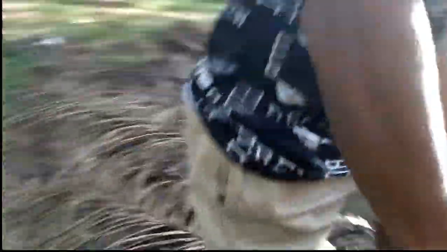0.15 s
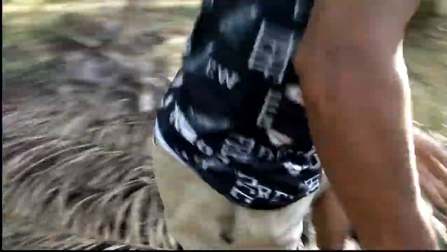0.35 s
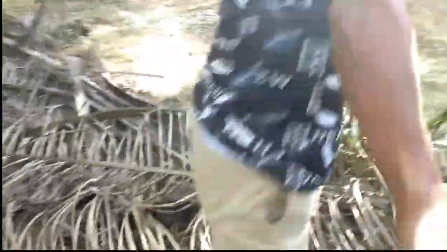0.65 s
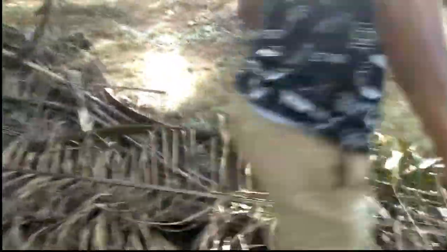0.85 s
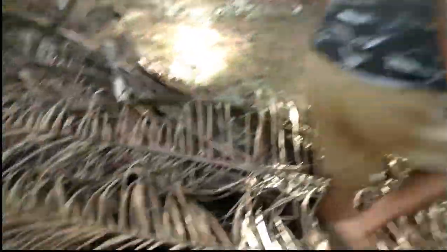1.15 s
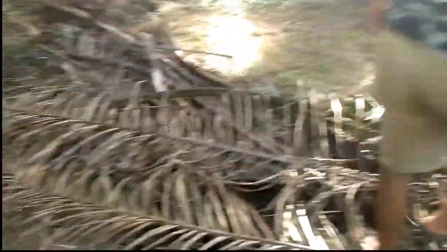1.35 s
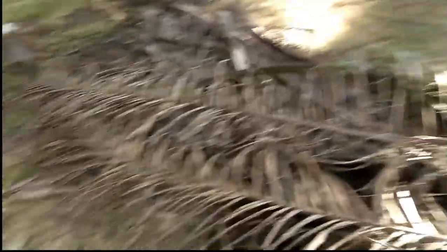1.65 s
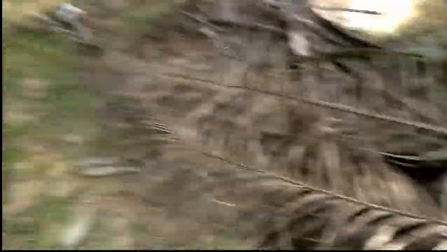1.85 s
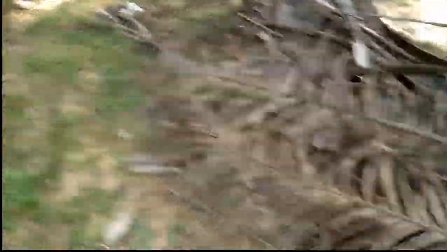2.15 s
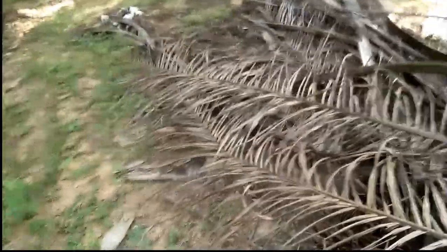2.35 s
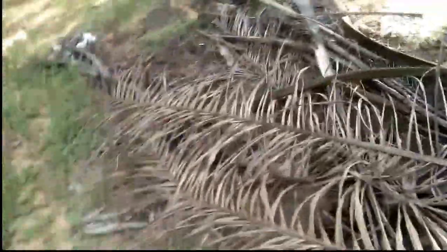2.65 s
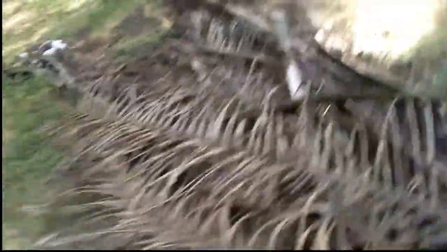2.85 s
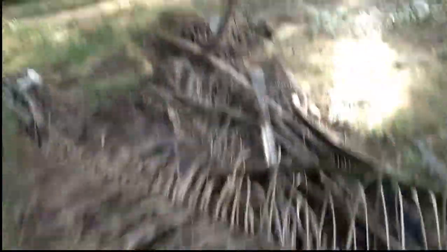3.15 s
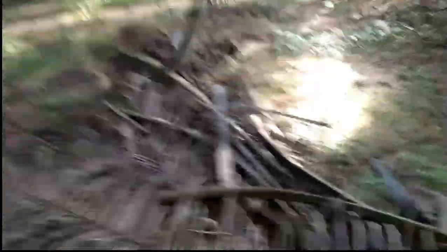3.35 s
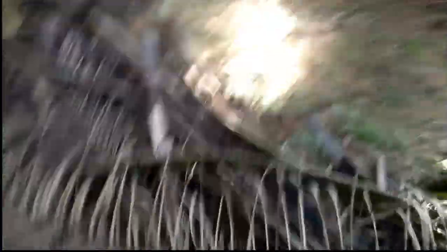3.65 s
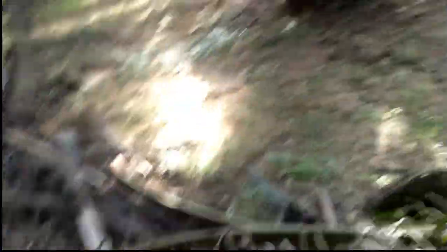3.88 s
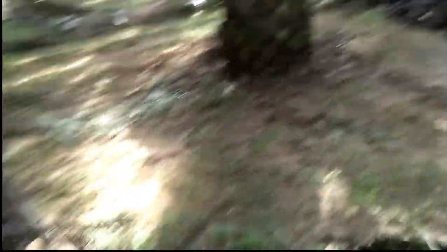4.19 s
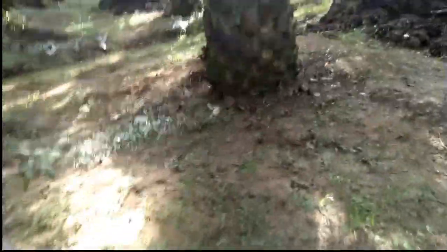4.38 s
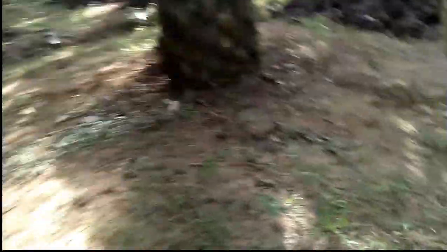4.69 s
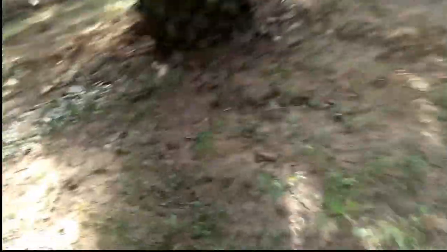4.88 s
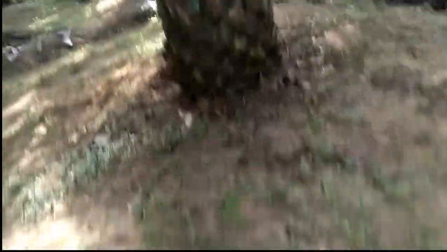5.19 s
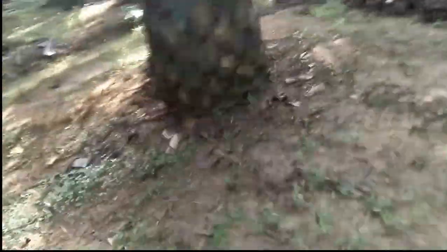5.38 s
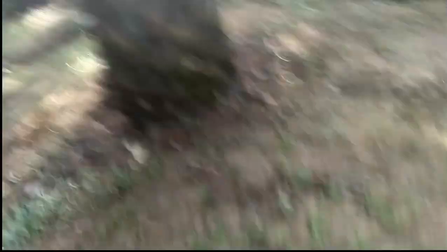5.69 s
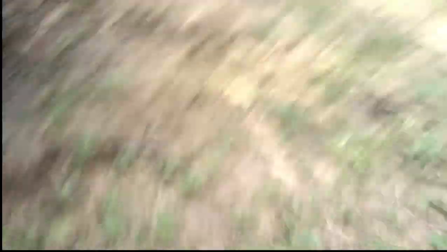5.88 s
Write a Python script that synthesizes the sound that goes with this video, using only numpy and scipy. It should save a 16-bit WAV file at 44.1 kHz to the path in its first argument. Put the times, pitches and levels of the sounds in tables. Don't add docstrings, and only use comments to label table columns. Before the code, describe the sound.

Close to a handheld camera and mostly on its left, dry palm leaflets are brushed aside in bright, papery rustles, with ticks and small rib snaps. The scraping thins out just before four and a half seconds, then feet trample the fronds: stalks crack and knock, soil crunches, and the loudest breaks come just after five seconds. Outdoors, with faint air, insects, a far engine hum and light wind rumble.

```python
import sys
import numpy as np
from scipy import signal
from scipy.fft import rfft, irfft, next_fast_len
from scipy.io import wavfile
from scipy.ndimage import uniform_filter1d, map_coordinates

SR = 44100
rng = np.random.default_rng(int(sys.argv[2]) if len(sys.argv) > 2 else 0)


def level_to_linear(level):
    exponent = np.asarray(level, float) / 20
    return 10 ** exponent


def store_pcm(level_fs):
    pcm = np.round(np.clip(level_fs, -1, 1) * 32767).astype(np.int16)
    wavfile.write(sys.argv[1], SR, np.atleast_2d(pcm).T)


N = 265923
LAG = 13
GRAIN = 192

# pitch in Hz, level in dB per Hz.
AIR_COLOUR = [(90, -30.5), (130, -17), (170, -23.5), (330, -25), (670, -36), (2200, -38.5), (3800, -29),
              (8400, -31), (15500, -22), (17000, -28.5)]
# pitch in Hz, level in dB per Hz.
WIND_COLOUR = [(4.7, -38), (8.0, 6.5), (17, 9.5), (54, -1.5), (64, -10), (81, -14), (140, -21), (180, -50),
               (310, -120)]
# time in seconds, level in dB.
WIND_LEVEL = [(0.0, -53.5), (0.3, -51.5), (0.5, -59.5), (0.62, -59), (0.8, -50), (1.1, -52.5), (1.45, -60),
              (2.1, -54), (2.55, -51.5), (3.05, -49), (3.5, -51.5), (4.15, -56.5), (4.5, -51),
              (4.89, -44.5), (5.15, -40.5), (5.42, -45.5), (5.64, -43.5), (5.9, -44)]
# pitch in Hz, width in Hz, level in dB.
ENGINE_HUMS = [
    (54.4, 14.6, -60.5),
    (108.4, 36, -68.5),
    (320, 2.4, -80),
]
# pitch in Hz, likeness from 0 to 1.
LIKENESS = [(60, 1), (300, 0.78), (1400, 0.027), (6800, 0.099), (15000, .1)]
# start in seconds, step in dB.
PORT_JOLTS = [
    (5.277, -18),
    (5.2991, -6.5),
    (5.303, -29.5),
    (5.31, -40),
]
# pitch in Hz, level in dB per Hz.
EDGE_COLOUR = [(2650, -36.5), (4500, -11.5), (5960, -10), (7260, -4), (8830, -2.5), (9410, 0), (11500, 1.5),
               (14900, -5.5), (16800, -15)]
# pitch in Hz, level in dB per Hz.
BLADE_COLOUR = [(760, -10), (1300, -14), (1530, -11.5), (2270, -3.5), (3460, -0.5), (4470, -1), (6000, -5),
                (7800, -87), (13200, -120)]
# pitch in Hz, level in dB per Hz.
STALK_COLOUR = [(100, -9), (170, -4.5), (367, 0), (620, -1), (787, -6.5), (1060, -4.5), (1700, -5),
                (2210, -11), (3740, -120)]
# start in seconds, peak in dB, pitch in Hz.
STALK_KNOCKS = [(1.013, -27, 296), (2.307, -36, 1020), (3.88, -41, 232), (5.144, -12, 573),
                (5.159, -13.5, 810), (5.189, -25, 780), (5.228, -16.5, 588), (5.304, -35, 228),
                (5.312, -58, 236), (5.501, -42.5, 407), (5.757, -37.5, 650), (5.874, -33.5, 630),
                (5.902, -65, 237), (6.011, -31.5, 350), (6.021, -25.5, 302)]
# start in seconds, peak in dB, pitch in Hz.
RIB_PINGS = [
    (0.793, -18, 1770),
    (1.013, -17, 1700),
    (1.023, -20, 1270),
    (1.424, -32, 2470),
    (1.508, -43.5, 2620),
    (4.922, -17.5, 1260),
    (5.851, -34, 2450),
    (1.711, -12.5, 3760),
    (5.299, -1, 2570),
    (5.8611, -25, 3770),
]
# start in seconds, peak in dB, left over right in dB.
EDGE_FLICKS = [(.2672, -30, -6), (0.317, -30, 13), (0.546, -41, -11), (.68, -28, -7), (.7961, -37, 5),
               (.8992, -26, -3), (.9368, -24, 2), (.9552, -30, -4), (.9669, -22, -4), (1.1032, -31, 6),
               (1.164, -25.5, -4), (1.168, -33, -1), (1.1917, -26, -11), (1.2805, -30, -5),
               (1.3376, -36, 3), (1.3807, -22, -3), (1.39, -31, 0), (1.4283, -19, -8), (1.4313, -23, 4),
               (1.6469, -28, 5), (1.7056, -16, 1), (1.7085, -16, 6), (1.7162, -19, 2), (1.9988, -27, 2),
               (2.0208, -28, 6), (2.539, -35, 13), (2.5653, -33, 18), (2.6603, -29.5, 8.5),
               (2.7126, -42, 9), (2.7486, -30, 9), (2.917, -31.5, 3), (3.242, -25, 7), (3.4391, -25, -2),
               (3.4445, -27, 4.5), (3.5279, -33, 3), (3.9384, -29, -3), (4.4436, -27, 6), (4.4707, -32, 6),
               (4.4961, -22, 9), (4.7773, -31, 4), (4.8081, -29, 4), (4.8095, -26.5, 1), (4.8946, -19, 2),
               (4.901, -22, 8), (4.9757, -19, 11), (5.0175, -26, 4), (5.1087, -19, 7), (5.1109, -20, 10),
               (5.1625, -12, 6), (5.2195, -18, 7), (5.487, -29, 11), (5.599, -36, 15), (5.613, -35, 6),
               (5.686, -39, 5), (5.7728, -33, 9), (5.8047, -26, 5), (5.8588, -25, 10), (5.9576, -24, 7),
               (5.965, -25, 4), (6.0001, -34, 10)]
# start in seconds, peak in dB, pitch in Hz.
RIB_POPS = [(0.655, -47, 3290), (0.761, -46, 3420), (0.937, -38, 1090), (0.957, -37, 3770),
            (1.103, -32, 4220), (1.111, -32, 3140), (1.198, -41, 4330), (1.314, -48, 3650),
            (1.512, -40, 3030), (1.792, -47, 3670), (1.82, -46, 2180), (2.125, -35, 2520),
            (2.184, -36, 2620), (2.362, -48, 3680), (2.649, -41, 2110), (2.68, -53, 3030),
            (2.772, -44, 3360), (3.425, -40.5, 3370), (3.554, -42, 4400), (3.843, -34, 2650),
            (3.936, -44, 1310), (3.948, -47, 4270), (3.992, -43, 1260), (4.457, -31, 3550),
            (4.486, -29.5, 3100), (4.515, -30, 3750), (4.705, -34, 4500), (4.81, -32, 3290),
            (4.928, -30, 3300), (4.984, -23, 2920), (5.034, -33, 1110), (5.13, -33, 3300),
            (5.139, -14, 2730), (5.15, -15, 3260), (5.213, -24, 4030), (5.426, -35, 3970),
            (5.485, -47, 3770), (5.508, -48, 3680), (5.774, -46, 4440), (5.845, -34, 3530)]
# start in seconds, peak in dB, left over right in dB, spray in dB.
THIN_SNAPS = [(0.7241, -26.5, -2, -15), (0.8253, -13.5, 6.5, -11), (.867, -16, 9, -12.5),
              (0.9502, -19, 0, -9), (1.3147, -22.5, -0.5, -33), (1.342, -23, 3, -17), (1.386, -25, -6, -17),
              (1.426, -16, 4, -17), (1.6567, -24, 2, -6), (1.743, -24.5, 0, -1), (2.2342, -3, 8.5, -25),
              (2.1495, -16.5, 10, -11), (2.156, -5.5, 5, -24), (2.2485, -22, -5, -6.5),
              (2.477, -32, 8, 0.5), (2.943, -13.5, 11, -15.5), (3.4751, -17.5, 1, -15),
              (3.5598, -13.5, -3, -12.5), (4.479, -26.5, 9, -2), (4.5328, -10, 5, -11.5),
              (4.54, -21, 11, -13), (4.641, -21.5, 4, -5), (4.6766, -22, -9, -6), (5.096, -13, 6, -14),
              (5.2136, -6.5, 4, -14), (5.2598, -13, 1, -22), (5.2944, -12.5, 9.5, -9),
              (5.378, -19.5, 3, -13), (5.4272, -24, 4, -23), (5.9611, -20.5, 14, -27.5)]
# start in seconds, peak in dB, left over right in dB, spray in dB.
STIFF_SNAPS = [(0.185, -16, 6, -15), (0.3198, -21.5, 7, -21), (.712, -33, 4, -23), (0.846, -23, -1, -5),
               (0.9686, -25, 10, -24), (0.995, -12.5, 2, -36), (1.1028, -25.5, 8.5, -1),
               (1.1302, -21.5, -5, -18), (1.3732, -25.5, -1, -7), (1.711, -13, 2, -8),
               (1.8702, -24, 0, -55), (2.501, -27, 8, -1), (2.8495, -31, 15, -13), (2.868, -29.5, 9, -26.5),
               (2.902, -18.5, 7, -8), (4.489, -32, 12, -18), (4.556, -20.5, 5, -3.5),
               (4.6466, -8.5, -15.5, -16), (4.6658, -18.5, 4, -5), (4.7067, -29, -24, -16),
               (4.876, -24, 2, -9), (5.1673, -11, -1, -7), (5.3736, -20.5, -3, -15), (5.3963, -21, 2, -12),
               (5.6672, -31.5, 3, -13), (5.724, -25.5, 6, -65), (5.759, -22.5, 0, -9.5),
               (5.862, -9.5, 9, -22), (5.9043, -12, 8.5, -31), (5.914, -24, 7, -24)]
# start in seconds, peak in dB, left over right in dB, spray in dB,
# thickness in dB.
THICK_SNAPS = [(0.777, -27, -2, -27, -25), (0.7913, -19, 2, -35, -26.5), (1.0111, -19, -8, -3, -8),
               (1.0144, -9, 6, -9, -20), (1.0252, -15, 7, -8, -8), (3.975, -30, 3, -18, -20),
               (4.5992, -20.5, 0, -6, -16), (4.896, -31.5, -2, -13, 0), (4.9839, -9, 8, -17.5, -16.5),
               (4.99, -13.5, 5, -11.5, -28), (5.003, -19, 1, -6, -9), (5.081, -27.5, -11, 1, -7),
               (5.1394, -17.5, 6, 1.5, -6), (5.1469, -14.5, 5, -3, -1), (5.191, -23, 5, -12, -18),
               (5.2235, -21, 9, -20, -23), (5.229, -10, 2, -18, -13.5), (5.2781, -8.5, 8, -18, -18.5),
               (5.2994, -6, 13, -3.5, -6), (5.3092, -15, 2, -24, -2.5), (5.696, -31.5, 1, -28, -15),
               (5.8087, -17, 3, -8.5, -29), (5.8731, -15, 5, -22, -23), (6.01, -37.5, 12, -1, -5)]
# loudest moment in seconds, edge level in dB,
# swell in seconds per 10 dB, fade in seconds per 10 dB, stiff blades over edges in dB.
BRUSHED_LEAFLETS = [(0.0, -42, .1, 0.3, -10.5), (.309, -36.5, 0.11, 0.03, -7.5), (.62, -45.5, 0.53, 0, -13),
                    (.84, -38.5, 0.07, 0.07, -24), (.92, -40, 0.12, -0.04, -10),
                    (1.014, -25.5, 0.0141, 0.03, -4.5), (1.082, -35, 0.17, 0.12, -7.5),
                    (1.385, -45.5, 0, 0.1, -10.5), (1.648, -31, 0.03, 0.05, -11.5),
                    (1.712, -31, 0.05, 0.09, -18), (2.119, -34, 0, -0.15, -9), (2.18, -37, 0.08, 0.03, -6),
                    (2.25, -35, 0.06, 0.07, -9.5), (2.38, -49, 0.3, -0.76, -3),
                    (2.5, -36, 0.06, 0.04, -10.5), (2.758, -44, 0.53, 0, -14.5),
                    (2.955, -33, 0.0443, 0.11, -12), (3.13, -33.5, 0.29, 0.13, -10),
                    (3.498, -34.5, 0.05, 0.05, -11.5), (3.66, -49, 4, 0.5, -13),
                    (3.92, -41, 0.07, -0.27, -7), (4.1, -60.5, 8, -3, -2)]
# loudest moment in seconds, edge level in dB,
# swell in seconds per 10 dB, fade in seconds per 10 dB, stiff blades over edges in dB.
TRAMPLED_LEAFLETS = [(4.409, -39.5, 0.012, 0.56, -5.5), (4.659, -21.5, 0.094, 0.04, -11.5),
                     (4.686, -27, 0.037, 0.022, -12), (4.77, -39, 0.033, 0.097, -8),
                     (4.915, -35, 0.024, 0.11, -7), (5.002, -26, 0.035, 0.043, -6.5),
                     (5.094, -32, 0.021, 0.061, -3.5), (5.141, -18, 0.0025, 0.084, -5),
                     (5.303, -24, 0.015, 0.034, 2.5), (5.356, -35, 0.056, 0.11, -6.5),
                     (5.775, -39, 0.013, .1, -18), (5.869, -34, 0.057, 0.066, -9),
                     (6.028, -41.5, 0.21, .1, -7.5)]
# loudest moment in seconds, level in dB,
# swell in seconds per 10 dB, fade in seconds per 10 dB.
FOOT_WEIGHT = [(0.0, -56.5, .1, 0.44), (.309, -45, -0.02, 0), (.744, -63.5, 3, 10), (.84, -50, -0.15, 0.09),
               (.99, -57, 0.1, -0.6), (1.654, -47.5, 0.02, -0.21), (1.716, -51, 0.06, -0.2),
               (2.159, -62, -0.7, 0.5), (2.626, -63, -1.5, 0.5), (2.955, -53, 0.05, 0.4),
               (3.15, -60, -0.2, -0.2), (3.498, -59.5, -0.1, 0.5), (3.909, -54, -0.44, 0.07),
               (4.659, -45, 0.15, 0.08), (4.91, -49, 0.07, 0.07), (5.001, -42, 0.04, 0.15),
               (5.094, -45.5, 0.07, 0.21), (5.156, -32, 0.01, 0.0664), (5.308, -31, 0.02, -0.01),
               (5.869, -56.5, 0.2, 1), (6.028, -39.5, 0.02, -3)]

REST_EDGE_DB, REST_BLADE_DB, REST_STALK_DB = -57, -63, -72.5
THIN_BLADE_DB, THIN_THUD_DB, STIFF_BLADE_DB, STIFF_THUD_DB = -25.5, -32, -15, -25.5
THICK_BLADE_DB, BLADE_PER_THICKNESS = -1.5, 0.96


def unit(x):
    return x / np.sqrt(np.mean(x ** 2) + 1e-20)


def along(points, hz):
    f, v = np.transpose(points)
    return np.interp(np.log(hz + 1), np.log(f + 1), v)


def wobble(rate):
    knots = rng.standard_normal(int(N * rate / SR) + 4)
    return map_coordinates(knots, [np.arange(N) * rate / SR])


def filtered(x, response):
    m = next_fast_len(N + SR // 2)
    hz = np.fft.rfftfreq(m, 1 / SR)
    return irfft(rfft(x, m) * response(hz), m)[..., :N]


def rush(gain, alike=LIKENESS):
    def mid_and_side(hz):
        turn = np.arccos(np.clip(along(alike, hz), -1, 1)) / 2
        return gain(hz) * np.array([np.cos(turn), np.sin(turn)])

    mid, side = filtered(rng.standard_normal((2, N)), mid_and_side)
    return unit(np.array([mid + side, mid - side]))


def near_left(x, left_db):
    return np.array([x[:N], np.pad(x, (LAG, 0))[:N]]) * level_to_linear([[left_db], [-left_db]])


def cracks(s, size, pan_db, t60, spectrum, tint_db, shared):
    t, hz = np.arange(GRAIN) / SR, np.fft.rfftfreq(GRAIN, 1 / SR)
    draw = rng.standard_normal((len(s), 3, GRAIN))
    tint = uniform_filter1d(draw[:, 2, :len(hz)], size=12, axis=1)
    lowest = np.minimum(hz / spectrum[0][0], 1) ** 3
    colour = lowest * level_to_linear(along(spectrum, hz) + tint_db * unit(tint))
    left, other = (irfft(rfft(draw[:, k]) * colour, GRAIN) for k in range(2))
    right = shared * left + np.sqrt(1 - shared ** 2) * other
    fade = level_to_linear(-60 * t / t60)
    shape = fade * (1 - np.exp(-t / 0.00037)) * (1 - t / t[-1])
    out = []
    for side, burst in enumerate([left, right]):
        lag = side * (LAG + 6 * draw[:, 2, -1])
        start = np.clip(np.round(s * SR + lag).astype(int), 0, N)
        at = start[:, None] + np.arange(GRAIN)
        burst = burst * shape
        evened = np.linalg.norm(shape) / np.linalg.norm(burst, axis=1)
        gain = size * level_to_linear(pan_db * (.5 - side)) * evened
        out.append(np.bincount(at.ravel(), (burst * gain[:, None]).ravel(), N + GRAIN)[:N])
    return np.array(out)


def swarm(spectrum, count, spread_db, clump_db, t60):
    chance = rng.random((count, 3))
    s = chance[:, 0] * N / SR
    clump = wobble(45)[(s * SR).astype(int)]
    size = level_to_linear(-spread_db * np.log(1 - chance[:, 1]) + clump_db * clump)
    pan_db = 2 + 6 * (chance[:, 2] - .5)
    return unit(cracks(s, size, pan_db, t60, spectrum, tint_db=-1, shared=0.68))


def swells(rows, rest_db):
    t = np.arange(0, N, 64) / SR
    s, db, swell, fade = np.transpose(rows)[:, :, None]
    rising = (s - t) / np.maximum(swell, .002)
    falling = (t - s) / np.maximum(fade, .005)
    level_db = db - 10 * np.where(t < s, rising, falling)
    power = level_to_linear(rest_db) ** 2 + np.sum(level_to_linear(level_db) ** 2, axis=0)
    return np.interp(np.arange(N) / SR, t, np.sqrt(power))


def patchy(x, patchy_db):
    z = signal.stft(x, nperseg=256)[2]
    field = uniform_filter1d(rng.standard_normal(z.shape), size=9, axis=1)
    field = uniform_filter1d(field, size=7, axis=2)
    return unit(signal.istft(z * level_to_linear(patchy_db * unit(field)), nperseg=256)[1][:, :N])


def peak(hz, centre_hz, width_hz):
    return 1 / (1 + (2 * (hz - centre_hz) / width_hz) ** 2)


def still_air():
    return level_to_linear(-53.5 + 0.39 * wobble(2.95)) * rush(lambda hz: level_to_linear(along(AIR_COLOUR, hz)))


def insects():
    return level_to_linear(-58 + 1.1 * wobble(2.5)) * rush(lambda hz: peak(hz, 7100, 600))


def far_engine():
    out = np.zeros((2, N))
    for centre, width, db in ENGINE_HUMS:
        out += level_to_linear(db + 1.6 * wobble(4)) * rush(lambda hz: peak(hz, centre, width))
    return out


def wind():
    level_db = np.interp(np.arange(N) / SR, *np.transpose(WIND_LEVEL))
    rumble = rush(lambda hz: level_to_linear(along(WIND_COLOUR, hz)), [(20, 0.15), (100, 0.74)])
    return level_to_linear(level_db + 1.56 * wobble(6.6)) * rumble


def jolt():
    t, out = np.arange(N) / SR, np.zeros((2, N))
    for s, db in PORT_JOLTS:
        age = np.maximum(t - s, 0)
        out[0] -= level_to_linear(db) * (1 - np.exp(-age / 0.001)) * np.exp(-age / 0.0344) * (1 - age / 0.034)
    return out


def knocks():
    out, t = np.zeros(N + SR), np.arange(SR // 10) / SR
    for s, db, hz in STALK_KNOCKS + RIB_PINGS:
        ring = np.sin(2 * np.pi * hz * t) + 0.1 * np.sin(2 * np.pi * 1.1 * hz * t)
        t60 = 0.0079 + 11 / hz
        out[round(s * SR):][:len(t)] += level_to_linear(db - 3.5 - 60 * t / t60) * (1 - np.exp(-t / 0.00041)) * ring
    return near_left(out, .7)


def flicks():
    s, db, pan_db = np.transpose(EDGE_FLICKS)
    return cracks(s, level_to_linear(db + 6.5), pan_db, .0038, EDGE_COLOUR, tint_db=4, shared=.7)


def pops():
    t, out = np.arange(GRAIN) / SR, np.zeros(N + SR)
    for s, db, hz in RIB_POPS:
        spread, phase = rng.random((2, 3, 1))
        tones_hz = hz * (1 + 0.4 * (spread - .5))
        ring = np.sin(2 * np.pi * (tones_hz * t + phase)).sum(axis=0)
        shape = level_to_linear(db + 0.5 - 60 * t / 0.007) * (1 - np.exp(-t / 0.00037)) * (1 - t / t[-1])
        out[round(s * SR):][:GRAIN] += shape * ring
    return near_left(out, 1.2)


def tearing(s, spray_db):
    starts = np.bincount(np.round(s * SR).astype(int), level_to_linear(spray_db - 1.5), N)
    t = np.arange(SR // 10) / SR
    one_spray = level_to_linear(-60 * t / 0.076) * (1 - np.exp(-t / 0.0013))
    fading = np.abs(signal.fftconvolve(starts, one_spray)[:N])
    thin = swarm(EDGE_COLOUR, count=5000, spread_db=1.0, clump_db=2.0, t60=0.028)
    stiff = swarm(BLADE_COLOUR, count=3000, spread_db=-0.5, clump_db=3.0, t60=0.033)
    return fading * (thin + level_to_linear(-13.5) * stiff)


def snaps():
    rows = [(*row, THIN_BLADE_DB, THIN_THUD_DB) for row in THIN_SNAPS]
    rows += [(*row, STIFF_BLADE_DB, STIFF_THUD_DB) for row in STIFF_SNAPS]
    for *row, thickness_db in THICK_SNAPS:
        rows.append((*row, THICK_BLADE_DB + BLADE_PER_THICKNESS * thickness_db, thickness_db))
    s, db, pan_db, spray_db, blade_db, thud_db = np.transpose(rows)
    blade_db = np.minimum(blade_db, -4)
    bright = cracks(s, level_to_linear(db + 7.7), pan_db, .0036, EDGE_COLOUR, tint_db=1.8, shared=.7)
    dull = cracks(s, level_to_linear(db + blade_db + 5), pan_db, .012, BLADE_COLOUR, tint_db=2.5, shared=.8)
    thud = cracks(s, level_to_linear(db + thud_db + 4), pan_db / 3, .03, STALK_COLOUR, tint_db=1.5, shared=.9)
    snap = filtered(bright + dull + thud, lambda hz: hz ** 4 / (hz ** 4 + 340 ** 4))
    return snap + tearing(s, db + spray_db)


def crunch():
    rough = level_to_linear(3.7 * wobble(70)) * rush(lambda hz: level_to_linear(along(STALK_COLOUR, hz)))
    return swells(FOOT_WEIGHT, REST_STALK_DB) * level_to_linear(-2.5) * unit(rough)


def leaflets():
    moves = BRUSHED_LEAFLETS + TRAMPLED_LEAFLETS
    edge_level = swells([(s, db, a, b) for s, db, a, b, _ in moves], REST_EDGE_DB)
    blade_level = swells([(s, db + stiff_db, a, b) for s, db, a, b, stiff_db in moves], REST_BLADE_DB)
    edges = swarm(EDGE_COLOUR, count=9000, spread_db=1.46, clump_db=0.32, t60=0.15)
    blades = swarm(BLADE_COLOUR, count=4500, spread_db=0.24, clump_db=0.92, t60=0.038)
    hiss = edge_level * level_to_linear(-0.4) * patchy(edges, patchy_db=2.5)
    crackle = blade_level * level_to_linear(-1.73) * patchy(blades, patchy_db=2.5)
    return hiss + crackle


def scene():
    background = still_air() + insects() + far_engine() + wind()
    near = knocks() + flicks() + pops() + snaps() + crunch() + leaflets()
    t = np.arange(SR // 5) / SR
    tail = rng.standard_normal((2, len(t))) * level_to_linear(-60 * t / 0.26) * (t > .004)
    answer = signal.fftconvolve(near, tail / np.linalg.norm(tail[0]), axes=1)[:, :N]
    return background + jolt() + near + level_to_linear(-18) * answer


def roll_off(x):
    return signal.sosfilt(signal.butter(12, 16800, fs=SR, output="sos"), x)


def record(dry):
    held = dry / (1 + np.abs(dry / .78) ** 6) ** (1 / 6)
    cut = filtered(held, lambda hz: np.maximum(1 / np.sqrt(1 + (hz / 15650) ** 80), .1))
    return roll_off(cut)


dry = scene()
out = record(dry)
store_pcm(out)
```